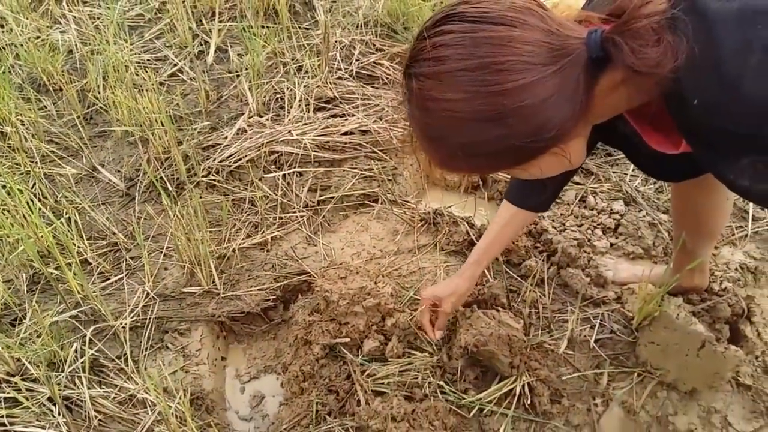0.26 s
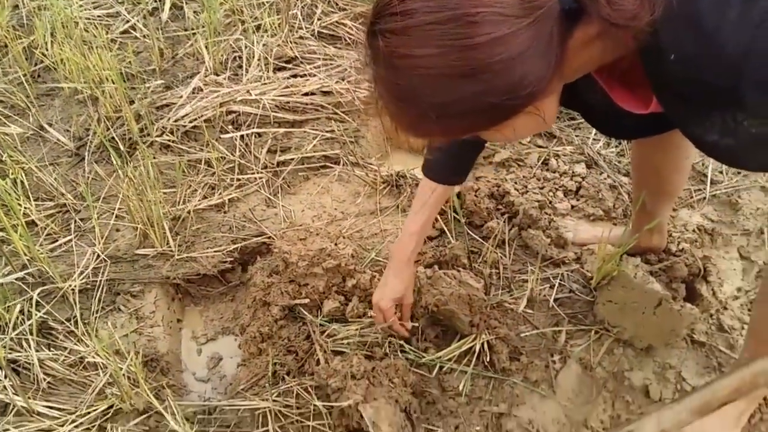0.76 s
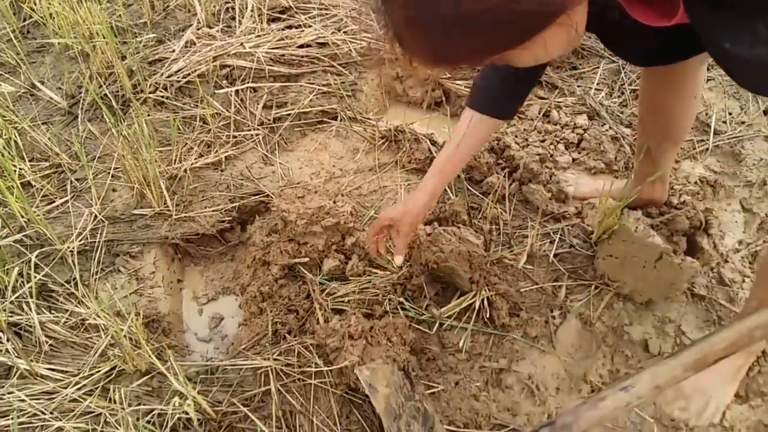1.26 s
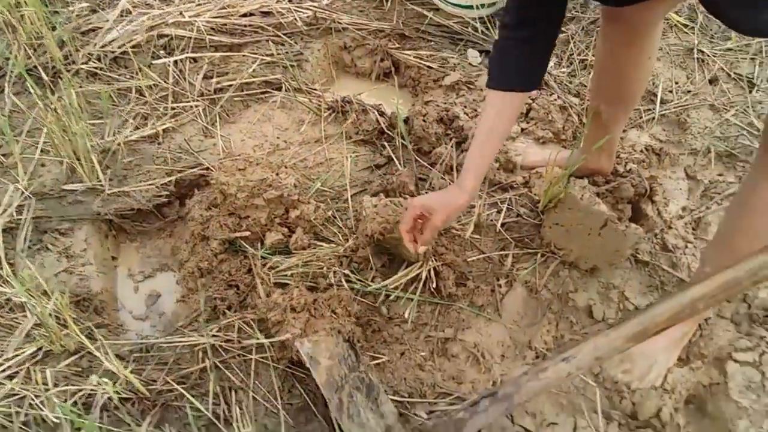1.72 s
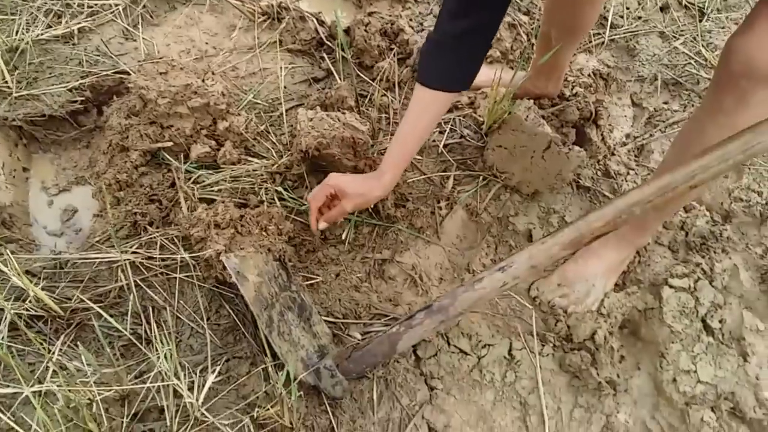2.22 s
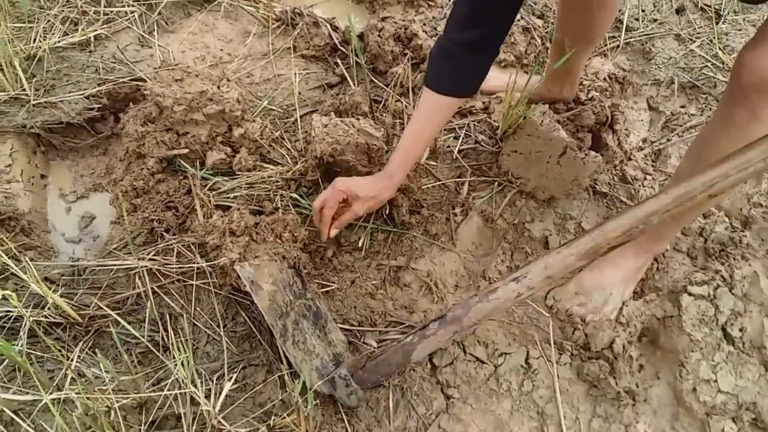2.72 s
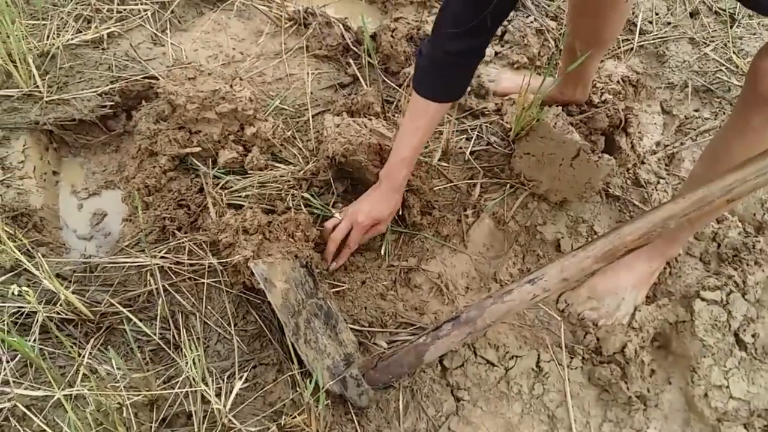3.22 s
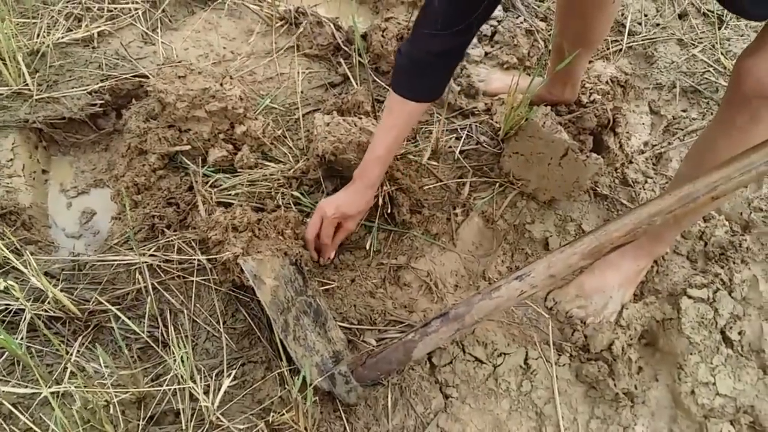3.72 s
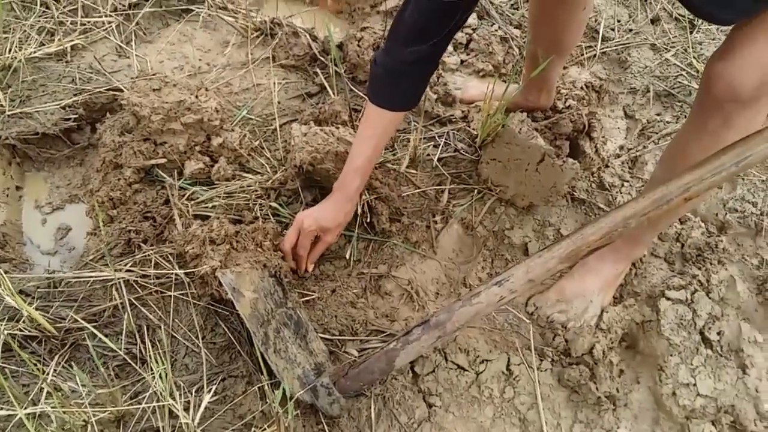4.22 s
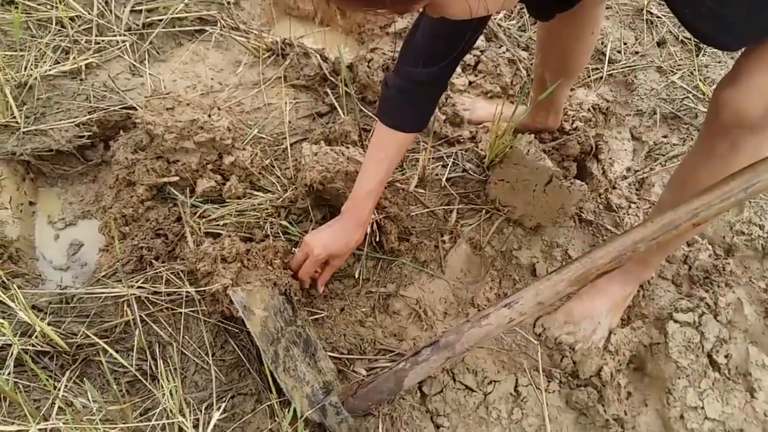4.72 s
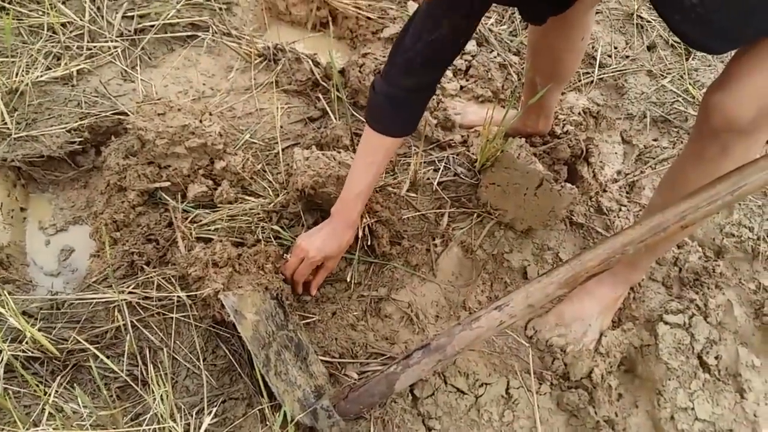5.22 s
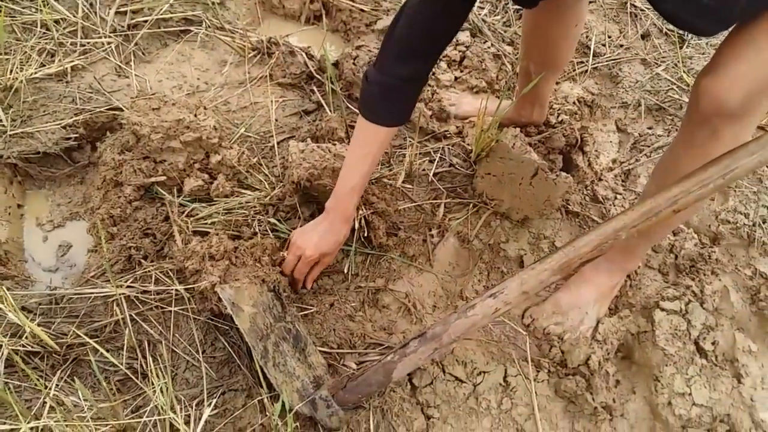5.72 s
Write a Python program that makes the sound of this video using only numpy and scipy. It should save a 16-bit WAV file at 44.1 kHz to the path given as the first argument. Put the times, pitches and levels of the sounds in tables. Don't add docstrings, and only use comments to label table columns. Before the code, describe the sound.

An open field with a slow farm engine running far away throughout. Its deep, blurred boom surges and drops unevenly like wind rumble, strongest at the very start, with a fluttering low throb above it. A grainy mid-range drone carries sharp valve knocks and short plate pings, dense until about 2 s, then sparser and softer. A second machine's low hum comes and goes. Fine, high insect hiss is constant, with faint brief buzzes near 2.1, 2.4, 5.4 and 5.7 s. Small dry soil ticks snap around 1.4-1.8 s and very faintly near 5 s. A distant bird chips rapidly from 0.9 to 1.4 s; high three-note calls recur roughly every 0.8 s, fading later. A nearer bird gives a quick diving whistle and buzzy warble at 2.3, 3.8 and 5.4 s, with light echoes. The handheld stereo microphones turn from about 1.5 to 3.5 s, shifting colour and balance.

```python
import sys
import numpy as np
from scipy import signal
from scipy.fft import rfft, irfft, next_fast_len
from scipy.io import wavfile
from scipy.ndimage import uniform_filter1d, map_coordinates

SR = 44100
rng = np.random.default_rng(int(sys.argv[2]) if len(sys.argv) > 2 else 0)


def store_wav(level_fs):
    pcm = np.round(np.clip(np.atleast_2d(level_fs), -1, 1) * 32767)
    wavfile.write(sys.argv[1], SR, pcm.T.astype(np.int16))


def amplitude_ratio(level_db):
    exponent = np.asarray(level_db, float) / 20
    return 10 ** exponent


N = 262836
TIME = np.arange(N) / SR

# time_s, turn_0_to_1
HAND_TURN = [
    (0, 0.06),
    (1.5, 0.05),
    (2.1, 0.52),
    (2.5, 0.55),
    (3.5, 0.99),
    (5.96, 0.85),
]

# time_s, level_db
CHORUS = [(0, -68), (1.3, -70.5), (1.75, -68), (2.7, -72), (4.2, -70.5), (4.8, -70.5), (5.36, -70),
          (5.96, -69)]
# freq_hz, density_db_per_hz, left_right_db
HISS_COLOURS = [
    [(4300.0, -2.5, 3), (4900.0, 4.5, 1), (5500.0, -7.5, 15), (5900.0, -4, 0.5), (6500.0, -8, 11), (6570, -9.5, -3), (8350, -15.5, 8), (8700, -6, -3), (9150, -10.5, -2), (9900.0, -13, 0), (10600, -13, 4), (11500, -12, 4.5), (12600, -19.5, -3), (15300, -18, 4)],
    [(4360, -11, -18), (4540, 7.5, 2.5), (5140, 2.5, 4.5), (5200, 0.5, -3), (5800, 2, 1), (7040, -6, 17), (7000, -10.5, -14), (8283, -10.5, -7.5), (8600, -3, 7.5), (9300.0, -9, -6), (10040, -9, -3), (11040, -4, 5.5), (11640, -11.5, -5), (15500.0, -13.5, 5)],
]
# freq_hz, likeness_0_to_1, left_lead_rad
HISS_PORTS = [
    [(4300.0, 0.25, -2.5), (4900.0, 0.42, -4.5), (5500.0, 0.41, -6.5), (5900.0, 0.24, -8.9), (6500.0, 0.11, -10.6), (7000.0, 0.08, -12.6), (8000.0, 0.07, -12.2), (8700.0, 0.21, -11.4), (9300.0, 0.1, -9.7), (9900.0, 0.15, -9.4), (10400.0, 0.12, -11.7), (11600.0, 0.39, -9.3), (12500.0, 0.02, -8.1), (15500.0, 0.14, -9.5)],
    [(4300.0, 0.25, 2.7), (4800.0, 0.3, 3.5), (5150.0, 0.41, 2.7), (5600.0, 0.26, -0.5), (6100.0, 0.49, -2.7), (6700.0, 0.19, -1.1), (7200.0, 0.18, -0.6), (8200.0, 0.01, -0.2), (8700.0, 0.43, -0.1), (9300.0, 0.06, 0.9), (9900.0, 0.04, -2.1), (11100.0, 0.39, -4.9), (11500.0, 0.3, -3.2), (15500.0, 0.08, -2.0)],
]
HISS_FOLLOWS = 0.46
# start_s, length_s, level_db
BUZZES = [
    (2.089, 0.18, -66.5),
    (2.432, 0.16, -65),
    (5.37, 0.16, -66),
    (5.733, 0.12, -69),
]
# start_s, level_db, pitch_hz, left_right_db
SOIL_TICKS = [
    (1.442, -50, 5700, 7),
    (1.511, -68, 5500, 4),
    (1.775, -49.5, 5800, 11),
    (4.921, -65, 6500, -5),
    (5.162, -70, 5900, 1),
]

# top_note_s, level_db, lead_in_stretch, lead_in_lift_hz, pause_cut_s
PHRASES = [
    (2.283, -47, 1, 0, .001),
    (3.822, -51, 1.6, 170, .0025),
    (5.4065, -52, .25, 250, .0025),
]
# time_from_top_s, pitch_hz, level_db
DIVE = [
    (-.018, 3830, -30),
    (-.013, 3830, -6),
    (-.005, 3930, -4),
    (-.003, 4150, -7),
    (0, 5080, -12),
    (.0045, 4150, -7),
    (.0075, 3750, -1),
    (.02, 2300, -2),
    (.0235, 2200, -40),
]
# time_from_top_s, pitch_hz, level_db, warble_depth_hz
WARBLE = [
    (.031, 2100, -40, 0),
    (.035, 2250, -5, 0),
    (.047, 3100, 1, 0),
    (.052, 3380, 0, 80),
    (.058, 3350, -2, 340),
    (.092, 3060, -2.5, 380),
    (.104, 2850, -9, 280),
    (.112, 2750, -40, 100),
]
WARBLE_HZ, FIRST_DIP_S, DIP_LOUDER_HZ_PER_DB = 112, .0575, 75
WARBLE_SKEW, RASP_DB = .65, 1.1
DULL_DB_PER_HZ2 = 2.2e-5
PHRASE_ECHO_DB = -63
# start_s, peak_db, left_right_db
TRIPLES = [
    (0.737, -59, 5.0),
    (1.532, -60, 4.0),
    (2.468, -63.5, 1),
    (3.297, -63.5, 5),
    (4.126, -63, 5),
    (4.9274, -66, 3),
    (5.75, -68, 3.0),
]
# start_s, level_db
CHIPS = [(.85, -70), (.944, -71), (.986, -68), (1.024, -64.5), (1.064, -64.5), (1.098, -70), (1.125, -71),
         (1.16, -70), (1.192, -70), (1.223, -65), (1.268, -64), (1.3, -70), (1.325, -68), (1.365, -69),
         (1.385, -70), (1.42, -70), (5.664, -71), (5.734, -72)]
CHIP_S, CHIP_FROM_HZ, CHIP_TO_HZ = .019, 5200, 4500
# start_s, length_s, from_hz, to_hz, level_db
SLURS = [(5.394, .016, 4000, 5600, -61), (5.389, .014, 4400, 4950, -69), (5.416, .01, 3500, 3350, -59),
         (5.42, .013, 2600, 2500, -58), (3.914, .022, 2720, 2690, -61), (5.433, .018, 4900, 4350, -70),
         (5.472, .015, 4800, 4350, -70), (5.508, .017, 4950, 4300, -68.5), (3.762, .01, 2560, 2620, -58),
         (.712, .026, 3300, 3050, -61), (.8, .06, 3820, 3800, -70), (.87, .048, 3800, 3790, -66.5),
         (3.744, .012, 2480, 2400, -54), (3.754, .014, 3350, 3150, -57), (5.84, .032, 2720, 2670, -58),
         (1.3, .125, 3750, 3920, -69), (1.425, .035, 3950, 4010, -70), (3.387, .021, 3150, 2850, -61),
         (3.408, .017, 2740, 2850, -60), (3.461, .017, 3100, 2820, -59), (3.477, .018, 2800, 2680, -58),
         (3.351, .012, 3370, 3330, -58), (3.416, .011, 3500, 3350, -60), (2.429, .009, 2600, 2520, -56),
         (1.86, .03, 3300, 3700, -66)]
PHRASE_PAN_DB, CHIP_PAN_DB, SLUR_PAN_DB = -3.5, 1, -4.5

# time_s, level_db
HUM = [(0, -57), (.31, -43.5), (.61, -62), (1.11, -47), (1.23, -52), (1.3, -46), (1.68, -53.5), (2.11, -64),
       (2.3, -70), (2.72, -52.5), (3.45, -52), (3.52, -57), (4.26, -50.5), (4.32, -45.5), (5.83, -49),
       (5.96, -45.5)]
HUM_HZ = 75.54
# pitch_hz, level_db
OVERTONES = [
    (355.3, -70.5),
    (398.4, -68),
    (436.0, -68.5),
]

# time_s, gain_db
CARRY = [(0, 1.5), (.41, -0.5), (.75, 3.5), (1.13, 0.5), (1.36, 0.5), (1.8, -0.5), (2.5, 0), (3.54, 1),
         (4.0, 1.5), (4.76, -2.5), (5.09, 1), (5.61, -1.5), (5.96, -1)]
# freq_hz, density_db_per_hz, left_right_db
DRONE_COLOURS = [
    [(360, -4.5, -7), (526, -6, 3), (900, -4.5, -2), (980, -9.5, 4.5), (1415, -1.5, -1.5), (1590, -7, 1), (1700, -2, 1.5), (1900, -5.5, -8.5), (2240, -0.5, -4), (3010, -5, -0.7), (3300, -16.5, 10), (3740, -10, -6), (4380, -23, -2)],
    [(354, -7, -13.5), (525, -4, 4), (714, -3, 2), (964, -7, 2), (1050, -1.5, 2.5), (1420, -4, -3), (1990, -6.5, -0.5), (2400, -6.5, 6), (2457, -1.5, -4), (2890, -7, -3), (3340, -1.5, -3.5), (3610, -6, -3), (3980, -26.5, -11), (4375, -21, 18.5)],
]
# freq_hz, likeness_0_to_1, left_lead_rad
DRONE_PORTS = [
    [(350.0, 0.89, -0.1), (500.0, 0.71, -0.5), (780.0, 0.74, -0.3), (1000.0, 0.33, -0.5), (1350.0, 0.71, 0.2), (1550.0, 0.49, 0.7), (1720.0, 0.67, 0.8), (2050.0, 0.58, -2.2), (2350.0, 0.79, -0.0), (2800.0, 0.59, 1.1), (3300.0, 0.08, 2.8), (3780.0, 0.46, 1.4), (4300.0, 0.25, 3.8)],
    [(350.0, 0.88, -0.1), (520.0, 0.51, -0.3), (700.0, 0.59, -0.4), (950.0, 0.52, -0.1), (1100.0, 0.69, -0.2), (1450.0, 0.34, 0.5), (1950.0, 0.31, 3.0), (2250.0, 0.29, 0.8), (2580.0, 0.73, 0.9), (2950.0, 0.34, 2.6), (3400.0, 0.72, 1.4), (3600.0, 0.61, 2.2), (3950.0, 0.37, 4.6), (4300.0, 0.25, 2.7)],
]
HIGH_DB, LOW_DB, LOW_TURNS_DB = -56.5, -62, -4
SURGE_S, SURGE_WIDTH_S, SURGE_DB = 1.75, .2, 2.5
# start_s, peak_db
KNOCKS = [(.003, -33), (.1945, -36.5), (0.3207, -34.5), (.334, -35.5), (.436, -36.5), (.535, -42),
          (.5546, -39), (.6639, -34.5), (.725, -32), (.7851, -34.5), (.9553, -43), (1.062, -43),
          (1.29, -36), (1.4267, -35.5), (1.7384, -39), (1.765, -40), (1.86, -42), (2.078, -46),
          (2.095, -41), (2.19, -44), (2.21, -48), (3.242, -39), (3.7474, -39), (4.0627, -46), (4.7533, -42),
          (5.1607, -37.5)]
TAP_DB, TAP_TURNS_DB, TAP_SCATTER_DB, TAP_SCATTER_S = -40.5, -3, 2.5, 0.007
# start_s, peak_db
PINGS = [(.0034, -52), (0.088, -37), (0.307, -39), (.5252, -35.5), (.7417, -48), (1.178, -37.5),
         (1.2886, -39), (1.5131, -36), (1.739, -36), (1.8497, -38), (2.076, -45), (2.371, -39),
         (2.862, -44.5), (3.4008, -45.5), (3.9523, -46), (4.4059, -48)]
PLATE_HZ, PLATE_SPREAD, PLATE_TURNS_DB = 1350, 0.02, -14

# time_s, cycles_done
CYCLE = [(-.022, -1), (.087, 0), (.526, 4), (1.178, 10), (1.737, 15), (2.077, 18), (3.086, 27), (3.952, 35),
         (4.406, 39), (5.763, 51), (5.99, 53)]
# time_s, level_db
LOAD = [(0.0, -36), (0.15, -47), (0.18, -61), (0.28, -42), (0.61, -49.5), (0.65, -40.5), (0.78, -42.5),
        (0.83, -50), (0.93, -39.5), (2.29, -46.5), (3.9, -43.5), (4.26, -47.5), (4.3, -43), (5.19, -45.5),
        (5.71, -44.5), (5.73, -57), (5.79, -49), (5.96, -52)]
# freq_hz, density_db_per_hz
BOOM = [
    (15, -43),
    (25, -35),
    (65, -0.5),
    (125, -8),
    (160, -32),
    (280, -120),
]
# freq_hz, density_db_per_hz
THROB = [
    (56, -37),
    (95, -4),
    (161, 1),
    (188, -7),
    (248, -8.5),
    (330, -23),
    (420, -27),
    (550, -39),
    (920, -120),
]
BOOM_DB, THROB_DB, THROB_FOLLOWS = -2, -44.5, 0.12


def unit(x):
    return x / np.sqrt(np.mean(x ** 2) + 1e-20)


def along(points, hz):
    f, *cols = np.transpose(points)
    return [np.interp(np.log(hz + 1), np.log(f + 1), c) for c in cols]


def curves(rows, t=TIME):
    s, *cols = np.transpose(rows)
    return [np.interp(t, s, c) for c in cols]


def wobble(rate_hz, t=TIME):
    return map_coordinates(rng.standard_normal(int(N * rate_hz / SR) + 4), [t * rate_hz])


def filtered(x, response):
    m = next_fast_len(N + SR // 4)
    return irfft(rfft(x, m) * response(np.fft.rfftfreq(m, 1 / SR)), m)[..., :N]


def patchy(depth_db):
    z = signal.stft(rng.standard_normal((2, N + 512)), nperseg=512)[2]
    field = rng.standard_normal(z.shape[1:])
    field = uniform_filter1d(uniform_filter1d(field, 6, 0), 8, 1)
    return signal.istft(z * amplitude_ratio(depth_db * unit(field)), nperseg=512)[1][:, :N]


def heard(pair, colour, ports):
    def port(hz, sign):
        (db, pan_db), (alike, lead_rad) = along(colour, hz), along(ports, hz)
        alike = (hz < 11800) * np.clip(alike, 0, 1) ** .8
        u = np.arccos(alike) / 2
        inside = (hz > .9 * ports[0][0]) & (hz < 1.02 * ports[-1][0])
        gain = inside * amplitude_ratio(db + sign * pan_db / 2) * np.exp(.5j * sign * lead_rad)
        return gain * [np.cos(u), sign * np.sin(u)]
    return np.array([filtered(pair, lambda hz: port(hz, sign)).sum(0) for sign in (1, -1)])


def turning(pair, colours, ports):
    angle = np.pi / 2 * np.clip(curves(HAND_TURN)[0], 0, 1)
    facing = unit(heard(pair, colours[0], ports[0]))
    turned = unit(heard(pair[::-1] * [[1], [-1]], colours[1], ports[1]))
    return np.cos(angle) * facing + np.sin(angle) * turned


def add(mix, s, sound, pan_db):
    spot = mix[:, round(s * SR):][:, :len(sound)]
    spot += amplitude_ratio([[pan_db / 2], [-pan_db / 2]]) * sound[:spot.shape[1]]


def whistle(hz):
    return np.sin(2 * np.pi * np.cumsum(hz) / SR)


def cycle(t=TIME):
    return 2 * np.pi * curves(CYCLE, t)[0]


def throb(depth_db):
    angle = cycle()
    swell = np.cos(angle - .9) + .5 * np.cos(2 * angle - .8)
    return amplitude_ratio(depth_db * (1.5 - 0.3 * curves(HAND_TURN)[0]) * swell)


def insect_hiss():
    level_db = curves(CHORUS)[0] + HISS_FOLLOWS * curves(CARRY)[0] + 2.5 + 0.35 * wobble(12.0)
    return throb(depth_db=0.2) * amplitude_ratio(level_db) * turning(patchy(depth_db=2.5), HISS_COLOURS, HISS_PORTS)


def insect_buzzes():
    pulses = np.zeros((2, N))
    band = unit(filtered(rng.standard_normal((2, N)), lambda hz: np.exp(-((hz - 7400) / 220) ** 2)))
    for s, length, db in BUZZES:
        t = np.arange(int(length * SR)) / SR
        wings = 0.45 + np.sin(np.pi * 95 * t) ** 2
        add(pulses, s, amplitude_ratio(db - 9.5) * wings * np.sin(np.pi * t / length) ** 0.3, 1.5)
    return pulses * band


def soil_ticks():
    mix = np.zeros((2, N))
    t = np.arange(SR // 100) / SR
    for s, db, hz, pan_db in SOIL_TICKS:
        snap = np.sin(2 * np.pi * hz * t) + 0.66 * np.sin(2 * np.pi * 0.96 * hz * t)
        snap *= 1 - np.exp(-t / 0.00065)
        add(mix, s, amplitude_ratio(db + 0.5 - 60 * t / 0.012) * snap, pan_db)
    return mix


def echoes(x):
    t = np.arange(SR // 5) / SR
    scatter = rng.standard_normal((2, len(t))) * amplitude_ratio(-60 * t / 0.16)
    return signal.fftconvolve(x, scatter / np.linalg.norm(scatter[0]), axes=1)[:, :N]


def far_birds(mix, wet):
    notes = [(*row, SLUR_PAN_DB) for row in SLURS]
    for s, db in CHIPS:
        notes.append((s, CHIP_S, CHIP_FROM_HZ, CHIP_TO_HZ, db - 2.0, CHIP_PAN_DB))
    for s, db, pan_db in TRIPLES:
        for k, step_db in [(-.55, -7), (0, 2.2), (1, 3.3), (2, 3)]:
            notes.append((s - .003 + k * .037, .02, 5680, 5280, db - 6.5 + step_db, pan_db))
    for s, length, from_hz, to_hz, db, pan_db in notes:
        u = np.linspace(0, 1, int(length * SR))
        breath = amplitude_ratio(db + 5.0 + 1.9 * wobble(146, u * length))
        swell = np.sin(np.pi * u) ** (0.39 + 0.0041 / length)
        note = breath * swell * whistle(from_hz + (to_hz - from_hz) * u ** 1.36)
        add(mix, s, note, pan_db)
        add(wet, s, amplitude_ratio(-6) * note, pan_db)


def near_bird(mix, wet):
    for s, db, stretch, lift_hz, hurry_s in PHRASES:
        t = np.arange(int(.15 * SR)) / SR - .03
        t = t + hurry_s * (t > .025)
        rows = [(*row, 0) for row in DIVE] + WARBLE
        hz, shape_db, depth_hz = curves(rows, np.where(t < 0, t / stretch, t))
        dip = 2 * np.pi * WARBLE_HZ * (t - FIRST_DIP_S)
        dip = dip + WARBLE_SKEW * np.cos(dip)
        hz = hz + lift_hz * np.where(t < .002, 1, -.5 * (t > .05))
        pitch_hz = hz - depth_hz * np.cos(dip)
        dulled = (t > -.003) * (shape_db > -29)
        shape_db = shape_db - lift_hz * DULL_DB_PER_HZ2 * np.clip(pitch_hz - 2900, 0, None) * dulled
        dip_db = depth_hz / DIP_LOUDER_HZ_PER_DB * np.cos(dip - .4)
        level_db = db + shape_db + RASP_DB * wobble(300, t + .03) + dip_db
        call = amplitude_ratio(level_db) * whistle(pitch_hz) * (shape_db > -39)
        add(mix, s - .03, call, PHRASE_PAN_DB)
        add(wet, s - .03, amplitude_ratio(PHRASE_ECHO_DB - db) * call, PHRASE_PAN_DB)


def birds():
    mix, wet = np.zeros((2, N)), np.zeros((2, N))
    far_birds(mix, wet)
    near_bird(mix, wet)
    return mix + echoes(wet)


def second_machine():
    level_db, = curves(HUM)
    line = amplitude_ratio(level_db + 3.0 + 1.2 * wobble(2.47)) * whistle(HUM_HZ + .5 * wobble(3.07))
    overtones = np.zeros(N)
    for hz, db in OVERTONES:
        overtones += amplitude_ratio(db + 4.5 + 1.5 * wobble(6.0)) * whistle(hz + 2.48 * wobble(4))
    passing = np.exp(-((TIME - 2.2) / .5) ** 2)
    return amplitude_ratio([[1.1], [-1.1]]) * (line + passing * overtones)


def valve_taps():
    cycle_s, done = np.transpose(CYCLE)
    s = np.interp(np.arange(done[-1]), done, cycle_s)
    late, size = rng.standard_normal((len(s), 2)).T
    level_db = TAP_DB + TAP_TURNS_DB * curves(HAND_TURN, s)[0] + TAP_SCATTER_DB * size
    return list(zip(s + TAP_SCATTER_S * late, level_db))


def valve_bursts():
    bursts = np.zeros((2, N))
    t = np.arange(SR // 8) / SR
    decay = (amplitude_ratio(-60 * t / 0.031) + 0.73 * amplitude_ratio(-60 * t / 0.21)) * (1 - np.exp(-t / 0.001))
    for s, db in KNOCKS + valve_taps():
        add(bursts, s - .001, amplitude_ratio(db - 14.5) * decay, 0)
    return bursts


def cover_plate():
    plate = np.zeros((2, N))
    t = np.arange(SR // 8) / SR
    for s, db in PINGS:
        hz = PLATE_HZ * (1 + PLATE_SPREAD * rng.standard_normal())
        ping = amplitude_ratio(db - 60 * t / 0.034) * (1 - np.exp(-t / 0.0049)) * np.sin(2 * np.pi * hz * t)
        add(plate, s - .003, ping, PLATE_TURNS_DB * curves(HAND_TURN, s)[0])
    return plate


def engine_drone():
    def above(hz, edge_hz):
        return hz ** 4 / (hz ** 4 + edge_hz ** 4)

    def clatter_tone(hz):
        return above(hz, edge_hz=1430) * (1 - 0.62 * above(hz, edge_hz=3260))

    high_db = HIGH_DB + curves(CARRY)[0]
    low_db = LOW_DB + LOW_TURNS_DB * curves(HAND_TURN)[0] + .5 * wobble(3.13)
    low_db = low_db + SURGE_DB * np.exp(-((TIME - SURGE_S) / SURGE_WIDTH_S) ** 2)
    grain = amplitude_ratio(1.16 * wobble(70))
    clatter = filtered(grain * valve_bursts() * rng.standard_normal((2, N)), clatter_tone)
    high = grain * throb(depth_db=0.6) * amplitude_ratio(high_db) * patchy(depth_db=1.35)
    high = filtered(high, lambda hz: np.sqrt(above(hz, edge_hz=1260)))
    low = amplitude_ratio(low_db + 7.0) * patchy(depth_db=0.0)
    low = filtered(low, lambda hz: np.sqrt(1 - above(hz, edge_hz=1200)))
    return amplitude_ratio(-52.5) * turning(clatter + high + low, DRONE_COLOURS, DRONE_PORTS) + cover_plate()


def exhaust(spectrum, level_db, blur_hz, noise_db):
    t = TIME[::16]
    angle = cycle(t)
    orders = np.zeros(len(t))
    for k in range(3, 60):
        firing = amplitude_ratio(2.5) if k % 4 == 0 else 1
        orders += firing * (wobble(blur_hz, t) * np.cos(k * angle) + wobble(blur_hz, t) * np.sin(k * angle))
    sources = (np.interp(TIME, t, orders), *rng.standard_normal((2, N)))
    mid, air, side = [unit(filtered(x, lambda hz: amplitude_ratio(along(spectrum, hz)[0]))) for x in sources]
    mid = unit(mid + amplitude_ratio(noise_db) * air)
    side = amplitude_ratio(-22 + 450 / spectrum[2][0]) * side
    return amplitude_ratio(level_db) * (amplitude_ratio([[.9], [-.9]]) * mid + side * [[1], [-1]])


def engine_exhaust():
    load_db, = curves(LOAD)
    throb_db = THROB_DB + THROB_FOLLOWS * (load_db - load_db.mean())
    flutter_db = 1.3 * np.cos(4 * cycle() + wobble(2)) + 1.5 * wobble(45)
    boom = exhaust(BOOM, load_db + BOOM_DB, blur_hz=1.478, noise_db=-6)
    return boom + exhaust(THROB, throb_db + flutter_db - .4, blur_hz=2.5, noise_db=-4.5)


def scene():
    field = insect_hiss() + insect_buzzes() + soil_ticks() + birds()
    return field + second_machine() + engine_drone() + engine_exhaust()


def band_limit(x):
    return signal.sosfilt(signal.butter(12, 15730, fs=SR, output="sos"), x)


def record(dry):
    mix = dry - .0006
    return band_limit(mix)


dry = scene()
out = record(dry)
store_wav(out)
```